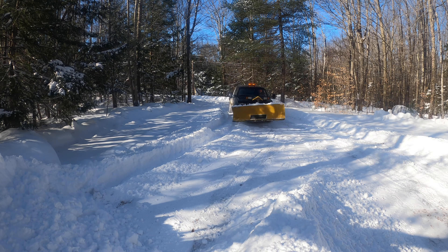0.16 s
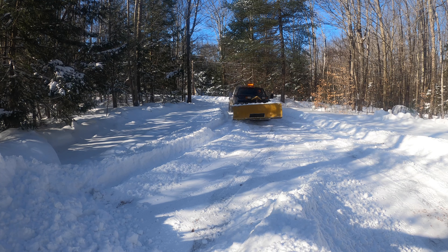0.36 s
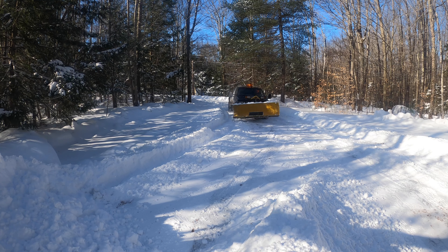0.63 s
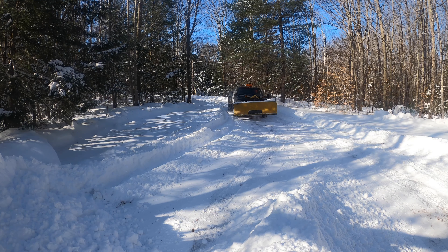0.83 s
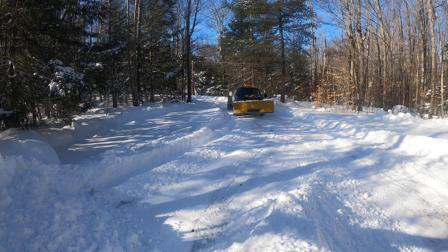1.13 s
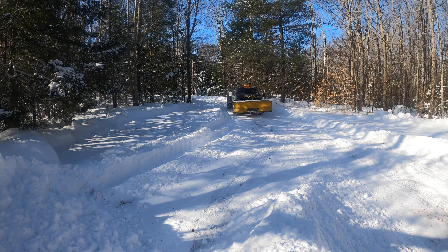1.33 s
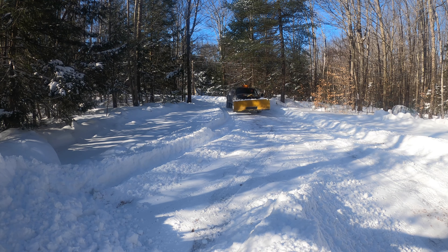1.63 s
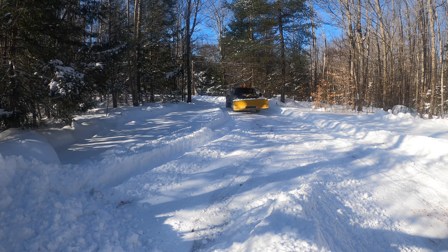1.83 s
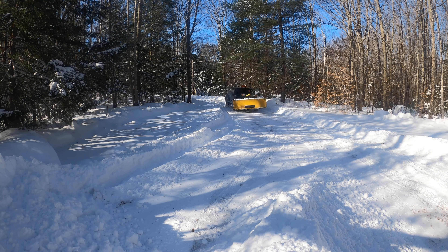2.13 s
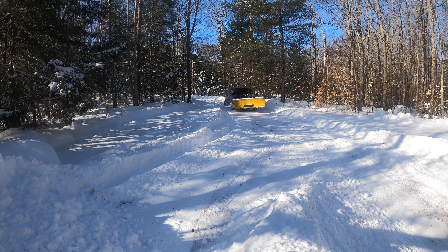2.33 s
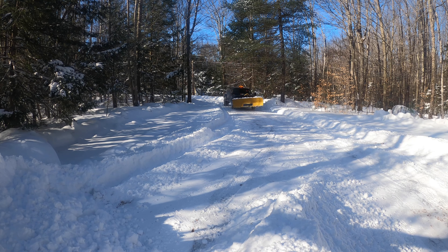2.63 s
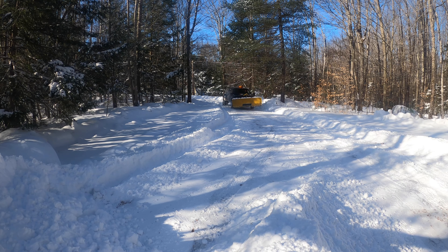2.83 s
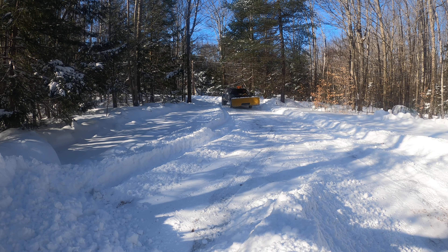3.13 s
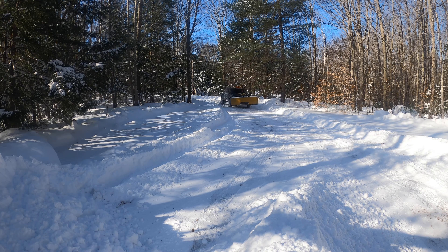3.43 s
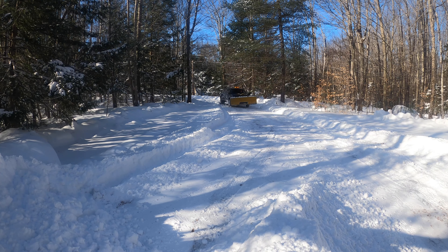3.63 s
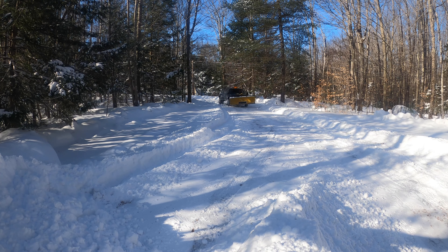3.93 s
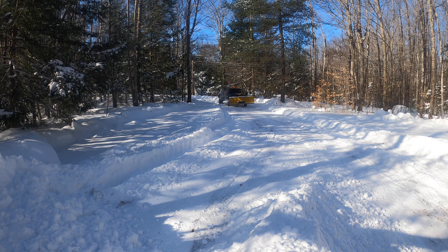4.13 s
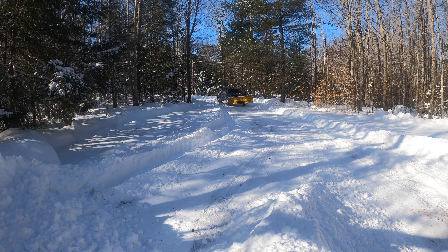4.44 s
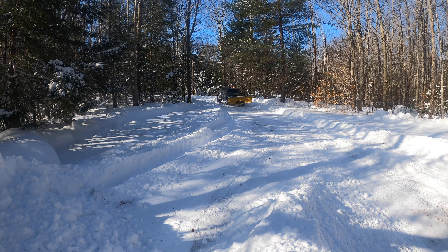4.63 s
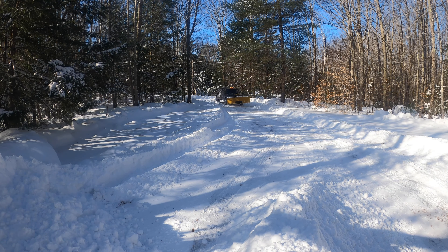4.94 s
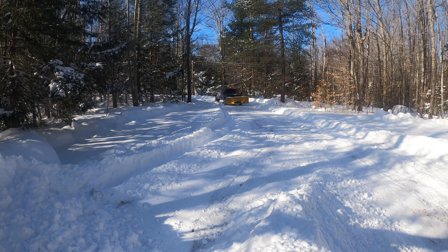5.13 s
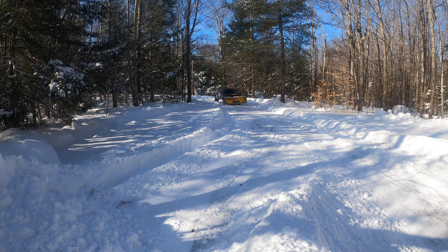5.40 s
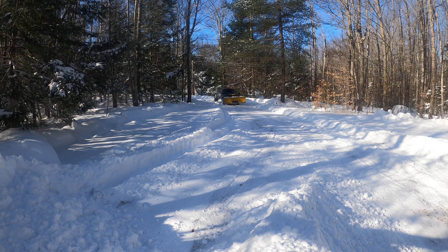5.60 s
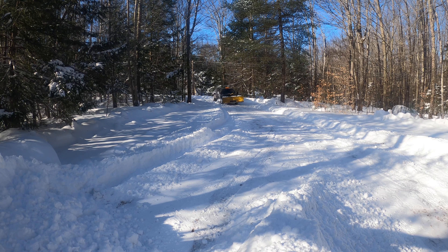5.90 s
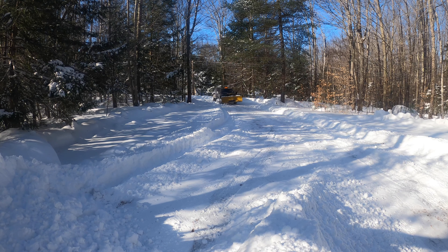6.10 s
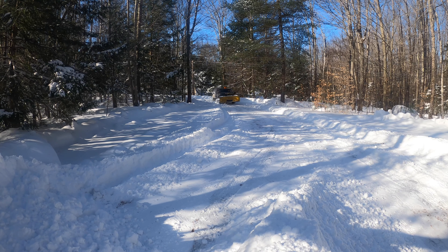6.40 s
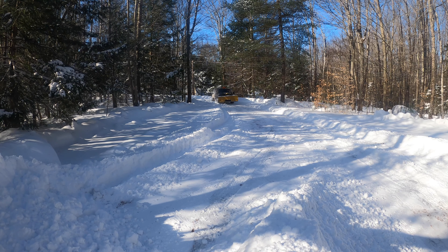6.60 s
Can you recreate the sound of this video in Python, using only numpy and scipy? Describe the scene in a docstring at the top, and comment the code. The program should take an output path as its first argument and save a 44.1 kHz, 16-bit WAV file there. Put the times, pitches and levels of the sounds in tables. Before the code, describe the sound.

Outdoors on a snowy wooded drive, a pickup with a raised plow backs away from a fixed microphone. Its low V8 burble pushes briefly at the start, then sags in pitch and fades. Tyres churn, fizz and crunch through snow; the plow knocks sharply early and again faintly around four seconds. Soft wind thumps sit underneath, and one small hard tick sounds close by late.

```python
"""An exhaust burbles and sags in speed as a V8 pickup with a raised plow backs away up a snowy drive.
Engine orders and pulsed noise make the exhaust; grains and noise make the tyres' churn, fizz and crunch.
Throbbing noise is the engine bay, narrow noise the hums, creaks and squeaks, ringing modes the plow knocks.
A breeze of low noise and bumps lies behind; one sharp ringing tick sounds close by.
The sound is mono at first and opens into stereo about halfway."""
import sys
import numpy as np
from scipy import signal
from scipy.fft import rfft, irfft, next_fast_len
from scipy.io import wavfile
from scipy.ndimage import uniform_filter1d

SR = 44100
rng = np.random.default_rng(int(sys.argv[2]) if len(sys.argv) > 2 else 0)


def waveform_to_disk(signal):
    """Save audio, clipped to [-1, 1], as 16-bit WAV at the path in sys.argv[1]."""
    frames = np.transpose(np.atleast_2d(signal))
    scaled = np.clip(frames, -1, 1) * 32767
    samples = np.round(scaled).astype(np.int16)
    wavfile.write(sys.argv[1], SR, samples)


N = 298116
T = np.arange(N) / SR
HOP = 128  # samples
FRAME_T = np.arange(N // HOP + 3) * HOP / SR

# Engine speed: t/s, four-stroke cycle rate f/Hz
ENGINE_SPEED = [(0, 5.964), (0.25, 5.957), (0.5, 5.794), (0.75, 5.825), (1, 5.612), (1.5, 5.629),
                (1.9, 5.541), (2.3, 5.492), (3, 5.33), (3.6, 5.285), (4, 5.049), (4.35, 4.981),
                (4.7, 5.016), (5.1, 5.166), (5.55, 5.286), (5.85, 5.176), (6.2, 5.033), (6.76, 5.17)]


def engine_turns():
    """Integrates the cycle rate into four-stroke cycles completed."""
    t, cycle_hz = np.transpose(ENGINE_SPEED)
    return np.cumsum(np.interp(T, t, cycle_hz)) / SR


# Exhaust orders: multiple of cycle rate (rounded for pitch; 8 = firing), near level/dB, far level/dB
EXHAUST_ORDERS = [(7.04, -14, -3.5), (8.05, 3.5, -7.5), (9, -4, -9), (11, -2.5, 1.5), (13, -1.5, -7),
                  (15.1, -18.5, -3), (16, -6.5, -18), (19, -4.5, -5.5), (20, -10, -19.5), (21.4, -6, -6.5),
                  (22, -6, -14), (23, -9.5, -12.5), (25, -10, -24.5), (25.9, -15.5, -32.5),
                  (27.2, -10, -10.5), (29.4, -24, -15), (30, -30.5, -31.5), (32, -31.5, -23),
                  (33, -20, -17), (34, -21.5, -25), (34.5, -18.5, -30), (37.6, -21.5, -32),
                  (37.8, -32.5, -20), (39, -22.5, -29), (43, -41, -21.5), (48, -20.5, -27)]
# Exhaust turbulence: f/Hz, relative level/dB per Hz
RUMBLE_SPECTRUM = [(8, -34), (20, -3.5), (35, -8.5), (55, 2), (80, 0), (120, -3), (165, -7.5), (230, -12.5),
                   (300, -16), (400, -25), (600, -28.5), (1500, -85)]
# Throttle pushes getting under way: t/s, half length/s, exhaust gain/dB
THROTTLE_PUSHES = [(.18, 0.25, 5), (.82, 0.31, 1.5)]
EXHAUST_BASE_DB, EXHAUST_LOSS_DB_PER_DOUBLING = -32, 1.68
WANDER_RAD_PER_ORDER = .022  # rms


def exhaust(turns, lines_db=-1.93, rumble_db=-6.5, uneven=0.14):
    """Uneven banks give orders that waver more the higher they lie; turbulent puffs add rumble."""
    swell = drift(4, count=len(EXHAUST_ORDERS))
    slip = drift(2.5, count=len(EXHAUST_ORDERS))
    far = np.clip((T - 1.5) / 3, 0, 1)  # 0 near, 1 far
    lines = np.zeros(N)
    for (order, near_db, far_db), a, b in zip(EXHAUST_ORDERS, swell, slip):
        size = gain_of(near_db + far * (far_db - near_db)) * (1 + uneven * a)
        phase = 2 * np.pi * (round(order) * turns + rng.random())
        lines += size * np.cos(phase + WANDER_RAD_PER_ORDER * order * b)
    firing = np.cos(2 * np.pi * 8 * turns)
    puffs = rng.standard_normal((2, N)) * (1 + 0.32 * firing)
    rumble = colour(puffs, RUMBLE_SPECTRUM)
    level_db = EXHAUST_BASE_DB - EXHAUST_LOSS_DB_PER_DOUBLING * doublings(T) + swells(THROTTLE_PUSHES)
    return gain_of(level_db) * (gain_of(lines_db) * evened(lines) + gain_of(rumble_db) * rumble)


# Shaken resonances: f/Hz, width/Hz, rms level at start/dB, loss per doubling of distance/dB
HUM_RESONANCES = [(208, 5, -50, 12), (396, 32, -62, 0.3)]


def drone():
    """Engine shake keeps resonances of the exhaust pipe and body humming, as narrow noise."""
    out = np.zeros(N)
    for hz, width_hz, db, loss_db in HUM_RESONANCES:
        out += gain_of(db - loss_db * doublings(T)) * evened(resonant_noise(N, hz, width_hz))
    return out


# Churn: f/Hz, relative level/dB per Hz
CHURN_SPECTRUM = [(150, -10), (300, -1), (400, -1.5), (500, 1.5), (620, 2), (850, 1), (1100, -5),
                  (1600, -10.5), (3000, -11.5), (8000, -58.5)]
# Fizz: f/Hz, relative level/dB per Hz
FIZZ_SPECTRUM = [(2000, 3), (4000, 8), (6000, -7.5), (8500, -1.5), (10200, -9.5), (11200, -22),
                 (12500, -24.5)]
# Crusty (+) or soft (-) snow: t/s, half length/s, churn gain/dB, fizz gain/dB
SNOW_STRETCHES = [(.1, 0.15, -5, 3), (1.7, 0.19, 2.5, 3.5), (2.6, 0.077, 2.5, 0.5),
                  (5.75, 0.088, -8.5, -20), (6.12, 0.57, 2.5, -1.5)]
CHURN_BASE_DB, CHURN_LOSS_DB_PER_DOUBLING = -48.5, 5.5
FIZZ_BASE_DB, FIZZ_LOSS_DB_PER_DOUBLING = -63, 5.5
TYRE_BITE = 1  # dB of churn per dB of throttle push
LUMPS_DB, LUMPS_HZ = 1.1, 2.5  # rms, wander rate


def tyres(turns, tilt_db):
    """Snow packing under the treads: dull churn and fine fizz, following snow and distance."""
    churn_grains = grains(per_s=500, spread_db=1.0, share=0.25)
    churn = through_air(colour(churn_grains, CHURN_SPECTRUM), patchy_db=1.16, tilt_db=tilt_db)
    fizz_grains = grains(per_s=2500, spread_db=4, share=.3)
    fizz = through_air(colour(fizz_grains, FIZZ_SPECTRUM), patchy_db=1.5, tilt_db=tilt_db)

    churn_db = CHURN_BASE_DB - CHURN_LOSS_DB_PER_DOUBLING * doublings(T)
    churn_db += TYRE_BITE * swells(THROTTLE_PUSHES) + swells(SNOW_STRETCHES, order=2)
    churn_db += tread_bites(turns) + LUMPS_DB * drift(LUMPS_HZ)[0]
    fizz_db = FIZZ_BASE_DB - FIZZ_LOSS_DB_PER_DOUBLING * doublings(T)
    fizz_db += swells(SNOW_STRETCHES, order=3) + 2.13 * drift(89)[0]
    return churn * gain_of(churn_db) + fizz * gain_of(fizz_db)


TREAD_START_DB, TREAD_FADE_S = 1, 2.3


def tread_bites(turns, per_cycle=5.6, jitter_cycles=0.22):
    """Tread blocks bite the snow in an uneven flutter, in dB, that fades as the truck recedes."""
    depth_db = TREAD_START_DB * np.exp(-T / TREAD_FADE_S)
    return depth_db * np.cos(2 * np.pi * (per_cycle * turns + jitter_cycles * drift(9.8)[0]))


# Engine bay: f/Hz, relative level/dB per Hz
BAY_SPECTRUM = [(300, -7), (700, -10), (1050, 0), (1400, 0.5), (1620, -1), (1880, -2.5), (2250, -9),
                (2800, -11.5), (3300, -17), (3800, -19.5), (4900, -21.5), (5750, -22), (7000, -27.5),
                (10300, -41.5), (11300, -73)]
BAY_BASE_DB, BAY_LOSS_DB_PER_DOUBLING = -49.5, 2.5


def engine_bay(turns, tilt_db, push_share=0.36):
    """Fan rush and valve clatter through the grille: noise throbbing with the engine."""
    throb = np.cos(2 * np.pi * np.outer([1, 3, 8], turns))
    rush = rng.standard_normal((2, N)) * (1 + np.array([.06, .09, .15]) @ throb)
    level_db = BAY_BASE_DB - BAY_LOSS_DB_PER_DOUBLING * doublings(T)
    level_db += push_share * swells(THROTTLE_PUSHES)
    return gain_of(level_db) * through_air(colour(rush, BAY_SPECTRUM), patchy_db=2.03, tilt_db=tilt_db)


# Snow giving way: t/s, level/dB before slip, centre f/Hz, width/Hz, length/s
SNOW_CRUNCHES = [(.02, -45, 520, 450, 0.11), (.18, -46, 940, 450, 0.14), (.12, -51.5, 790, 450, 0.71),
                 (.77, -47.5, 840, 600, 0.18), (1.54, -50, 845, 400, 0.105), (3.23, -56, 500, 600, .12),
                 (3.62, -55.5, 330, 700, 0.12), (3.88, -55, 380, 300, .06), (4.1, -54, 530, 400, 0.12),
                 (5.93, -56, 1050, 450, 0.43), (6.36, -46.5, 166, 60, .48)]


def snow_crunches():
    """Snow gives way under the tyres in short spells of narrow noise."""
    return rubs(SNOW_CRUNCHES)


# Creak bands: f/Hz, width/Hz, rms level outside the spell/dB
CREAK_BANDS = [(1370, 290, -61), (1763, 260, -65)]
# Creakiest spell: t/s, half length/s, rise/dB
CREAKIEST = (2.4, 1.4, 2.9)


def creaking(clump_db=4, clumps_hz=26):
    """Cold snow creaks under the treads in short clumps, each band on its own."""
    out = np.zeros(N)
    for hz, width_hz, db in CREAK_BANDS:
        clumps = gain_of(clump_db * drift(clumps_hz)[0])
        out += gain_of(db) * evened(resonant_noise(N, hz, width_hz) * clumps)
    return out * gain_of(swells([CREAKIEST]))


# Plow jolts: t/s, level/dB, favoured f/Hz
PLOW_JOLTS = [(.08, -46, 1900), (.21, -40, 900), (.261, -30, 300), (.338, -27.5, 900), (.871, -36, 780),
              (4.107, -38.5, 430), (4.163, -39, 470)]
# Plow modes: f/Hz, level/dB, t60/s
PLOW_RINGS = [(263, 0, 0.065), (377, -0.5, .13), (504, -1, .06), (685, -14, 0.036), (850, -1, 0.051),
              (950, -5.5, .035), (1250, -16, .025), (1850, 8, 0.05)]


def plow_knocks():
    """The hanging plow jolts against its frame on bumps, ringing its modes."""
    return struck(PLOW_JOLTS, PLOW_RINGS, rise_s=.002, focus_db=12)


# Frame squeaks: t/s, level/dB before slip, centre f/Hz, width/Hz, length/s
FRAME_SQUEAKS = [(1.0, -63, 2900, 450, 0.55), (1.28, -57, 2700, 250, 0.035), (2.41, -74, 7400, 700, .11),
                 (2.5, -73, 8250, 600, .053), (3.688, -66.5, 5776, 140, .034),
                 (3.735, -64.5, 4050, 400, .055), (3.98, -73.5, 5800, 500, 0.12),
                 (4.0, -69.5, 3700, 700, 0.83), (4.275, -69, 6150, 900, 0.04),
                 (4.32, -73, 5750, 1000, 0.26)]


def plow_squeaks():
    """The plow frame rubs, catching and slipping, in short squeaks of narrow noise."""
    return rubs(FRAME_SQUEAKS)


# Tick contacts: t/s, level/dB, favoured f/Hz
TICK_CONTACTS = [(5.5183, -45, 3600), (5.5192, -40, 7100), (5.5196, -37, 2700), (5.5231, -49.5, 5000)]
# Tick modes: f/Hz, level/dB, t60/s
TICK_RINGS = [(1750, -3, .006), (2330, -4, .008), (2720, -1, .019), (3300, -7, .006), (4000, -2, .009),
              (5550, -7, .016), (5850, -10, .012), (6700, -5, .004), (7100, 0, .005), (7650, -4, .004)]


def tick(tail_db=-35, tail_s=0.024):
    """A small hard thing snaps and rings briefly, with a little scatter at each microphone."""
    out = struck(TICK_CONTACTS, TICK_RINGS, rise_s=.0003, focus_db=14)
    t = np.arange(SR // 10) / SR
    scatter = gain_of(tail_db) * rng.standard_normal((2, len(t))) * np.exp(-t / tail_s)
    return out + signal.oaconvolve(out[None], scatter, axes=1)[:, :N]


# Breeze: f/Hz, relative level/dB per Hz
BREEZE_SPECTRUM = [(6, -18), (20, 1), (45, 3), (80, 6), (130, -8), (220, -26), (400, -33), (1200, -73)]
# Gusts: t/s, half length/s, rise/dB
BREEZE_GUSTS = [(.15, 0.071, 9), (.85, 0.3, 8.5), (4.0, 1, 4.5), (6.15, 0.22, 9)]
# Eddies: t/s, level/dB, f/Hz, half length/s, lean/dB (added left, taken from right)
EDDY_BUMPS = [(0.381, -20.5, 52, 0.023, -2), (0.652, -19, 71.4, 0.0048, 0), (0.723, -19, 50, 0.012, 0),
              (0.787, -21.5, 40, 0.028, 3), (0.893, -23, 38.8, 0.024, -2), (1.569, -22.5, 53.7, 0.0097, 0),
              (4.636, -38, 45.6, 0.0066, 15.5), (5.063, -27, 58.4, 0.016, 8), (5.381, -25, 48, 0.022, 10),
              (6.064, -39, 69, 0.0085, 14), (6.123, -29.5, 48.3, 0.026, 11.5)]
CALM_DB = -45  # rms between gusts


def wind():
    """Each microphone has its own low flutter; single eddies bump both with short, low swings."""
    out = evened(shaped(rng.standard_normal((2, N)), BREEZE_SPECTRUM))
    out = out * gain_of(CALM_DB + swells(BREEZE_GUSTS))
    for s, db, hz, half_s, left_db in EDDY_BUMPS:
        bump = np.exp(-((T - s) / half_s) ** 2) * np.cos(2 * np.pi * hz * (T - s))
        out -= gain_of([[db + left_db], [db - left_db]]) * bump
    return out


SLIP_DB, SLIP_HZ = 2.5, 69  # rms, wander rate


def rubs(rows):
    """Short spells of catching and slipping, each exciting one resonance."""
    out = np.zeros(N)
    for s, db, centre_hz, width_hz, length_s in rows:
        ring = resonant_noise(SR, centre_hz, width_hz)[:int(length_s * SR)]
        add(out, s, gain_of(db) * evened(ring * signal.windows.tukey(len(ring), .7)))
    return out * evened(gain_of(SLIP_DB * drift(SLIP_HZ)[0]))


def struck(rows, modes, rise_s, focus_db):
    """Each contact rings the modes of a body, favouring those near its own pitch."""
    t, out = np.arange(SR // 4) / SR, np.zeros(N)
    for s, level_db, favoured_hz in rows:
        ring = np.zeros(len(t))
        for hz, db, t60_s in modes:
            mode_db = db - focus_db * np.log2(hz / favoured_hz) ** 2 - 60 * t / t60_s
            ring += gain_of(mode_db) * np.sin(2 * np.pi * (hz * t + rng.random()))
        add(out, s, gain_of(level_db) * np.minimum(t / rise_s, 1) * ring)
    return out


def grains(per_s, spread_db, share):
    """Countless tiny snow fractures merge into noise; larger ones stand out with a share of the power."""
    sizes = gain_of(spread_db * np.minimum(rng.exponential(1, (2, N)), 4))
    clicks = sizes * rng.standard_normal((2, N)) * (rng.random((2, N)) < per_s / SR)
    share = np.clip(share, 0, 1)
    return np.sqrt(share) * evened(clicks) + np.sqrt(1 - share) * rng.standard_normal((2, N))


def resonant_noise(size, centre_hz, width_hz):
    """Noise through one resonance."""
    hz = np.fft.rfftfreq(size, 1 / SR)
    return irfft(rfft(rng.standard_normal(size)) / (1 + (2 * (hz - centre_hz) / width_hz) ** 2), size)


START_M, REVERSE_M_PER_S = 16, 3.75


def doublings(t):
    """Doublings of the truck's distance by time t, backing away at an even pace."""
    return np.log2(1 + REVERSE_M_PER_S * t / START_M)


def through_air(pair, patchy_db, tilt_db):
    """Moving air makes spectral patches swell and fade; treble tilts by tilt_db per octave above 2 kHz."""
    hz, _, z = signal.stft(pair, SR, nperseg=4 * HOP, noverlap=3 * HOP)
    patches = rng.standard_normal(z.shape[1:])
    patches = uniform_filter1d(patches, size=3, axis=0)  # over frequency
    patches = evened(uniform_filter1d(patches, size=20, axis=1))  # over time
    octaves = np.log2(np.maximum(hz / 2000, 1))[:, None]
    z = z * gain_of(patchy_db * patches + octaves * tilt_db[:z.shape[2]])
    return signal.istft(z, nperseg=4 * HOP, noverlap=3 * HOP)[1][:, :N]


# Side filter: f/Hz, gain/dB
SIDE_SPREAD = [(60, -37), (400, -21), (800, -14.5), (1500, -10), (3000, -7.5), (6000, -1), (10000, -0.5)]


def colour(pair, spectrum):
    """Shapes two unrelated signals and spreads them as middle and side."""
    mid, side = evened(shaped(pair, spectrum))
    side = shaped(side, SIDE_SPREAD)
    return np.array([mid + side, mid - side])


def shaped(x, spectrum):
    """Filters by a spectrum table read on a log-frequency axis."""
    size = next_fast_len(N)
    f, db = np.transpose(spectrum)
    bins_hz = np.fft.rfftfreq(size, 1 / SR)
    gain = gain_of(np.interp(np.log(bins_hz + 1), np.log(f + 1), db))
    return irfft(rfft(x, size) * gain, size)[..., :N]


def drift(rate_hz, count=1):
    """Slow random wander of rms 1, one row for each thing that wanders."""
    frames = len(FRAME_T)
    hz = np.fft.rfftfreq(frames, HOP / SR)
    slow = irfft(rfft(rng.standard_normal((count, frames))) * np.exp(-(hz / rate_hz) ** 2), frames)
    return np.array([np.interp(T, FRAME_T, evened(row)) for row in slow])


def swells(rows, order=2):
    """Smooth rises and falls in dB: one bell per row, its height from column `order`."""
    return sum(row[order] * np.exp(-((T - row[0]) / row[1]) ** 2) for row in rows)


def gain_of(db):
    """Decibels to amplitude."""
    return 10 ** (np.asarray(db) / 20)


def evened(x):
    """Scales to rms 1."""
    return x / np.sqrt(np.mean(x ** 2) + 1e-20)


def add(mix, s, sound):
    """Mixes a sound in at time s."""
    part = mix[max(round(s * SR), 0):][:len(sound)]
    part += sound[:len(part)]


TREBLE_START_DB_PER_OCTAVE = 0.98
AIR_LOSS_DB_PER_OCTAVE = 0.8  # for each doubling of distance


def scene():
    """The truck straight ahead, the tick close by and the breeze."""
    turns = engine_turns()
    tilt_db = TREBLE_START_DB_PER_OCTAVE - AIR_LOSS_DB_PER_OCTAVE * doublings(FRAME_T)
    engine = exhaust(turns) + drone() + engine_bay(turns, tilt_db)
    snow = tyres(turns, tilt_db) + snow_crunches() + creaking()
    plow = plow_knocks() + plow_squeaks()
    return engine + snow + plow + tick() + wind()


STEREO_FROM_S, STEREO_OPENS_S = 3.33, 1  # onset, time constant
EDGE_HZ = 13000


def record(dry):
    """Widens the image from mono to stereo, softens the ends and low-passes."""
    width = 1 - np.exp(-np.maximum(T - STEREO_FROM_S, 0) / STEREO_OPENS_S)
    mid = dry.mean(0)
    side = (dry[0] - dry[1]) / 2 * width
    soft_ends = np.minimum(np.minimum(T, T[-1] - T) / .003, 1)
    edge = signal.firwin(101, EDGE_HZ, window=("kaiser", 7), fs=SR)
    return signal.oaconvolve(np.array([mid + side, mid - side]) * soft_ends, edge[None], "same")


dry = scene()
out = record(dry)
waveform_to_disk(out)
```